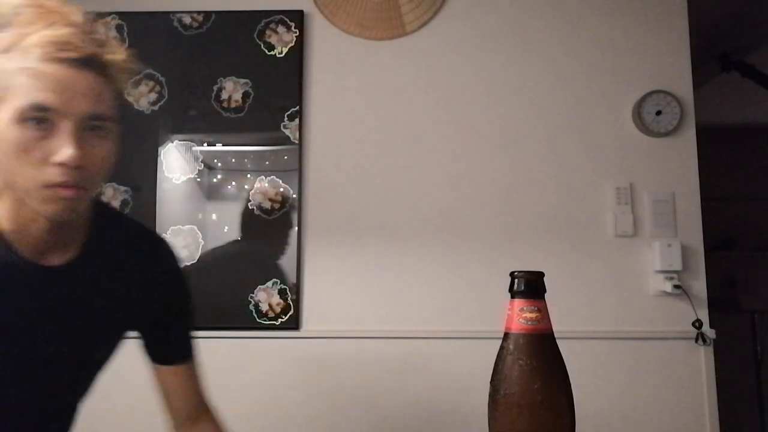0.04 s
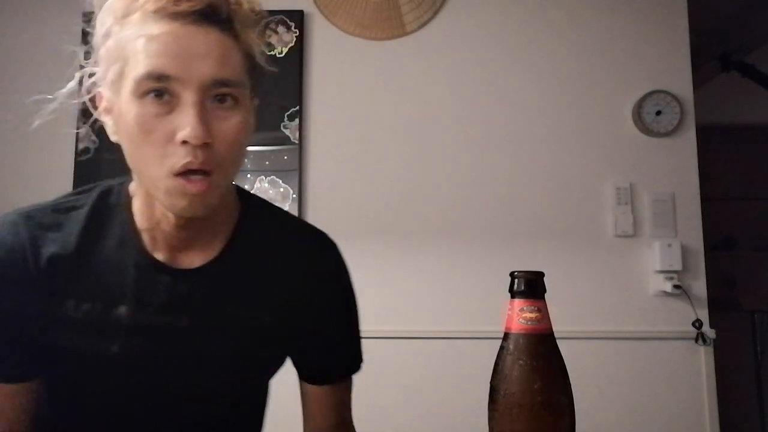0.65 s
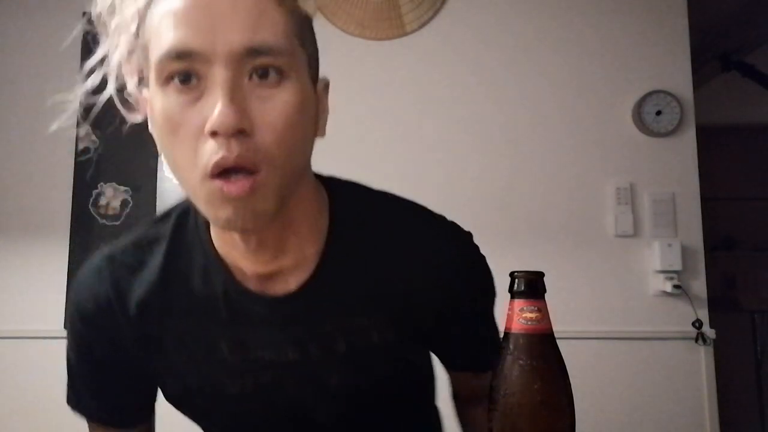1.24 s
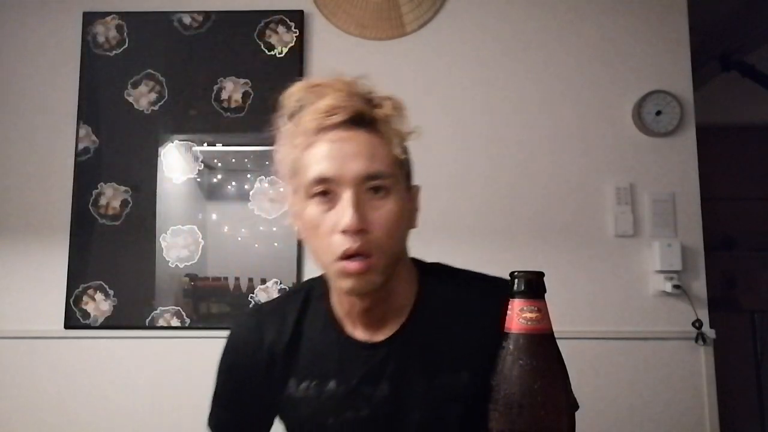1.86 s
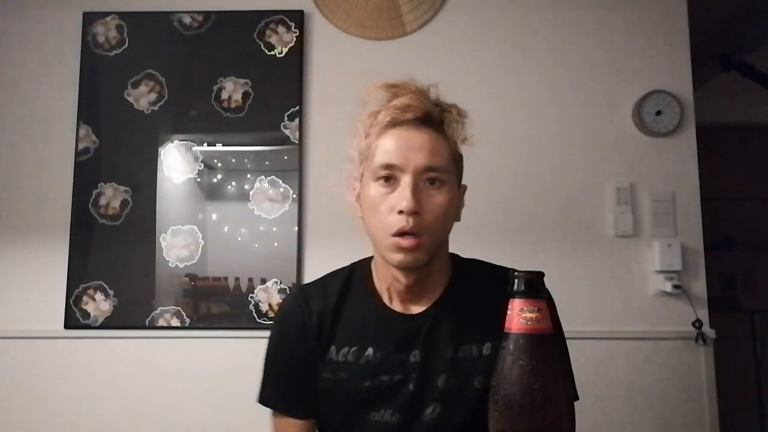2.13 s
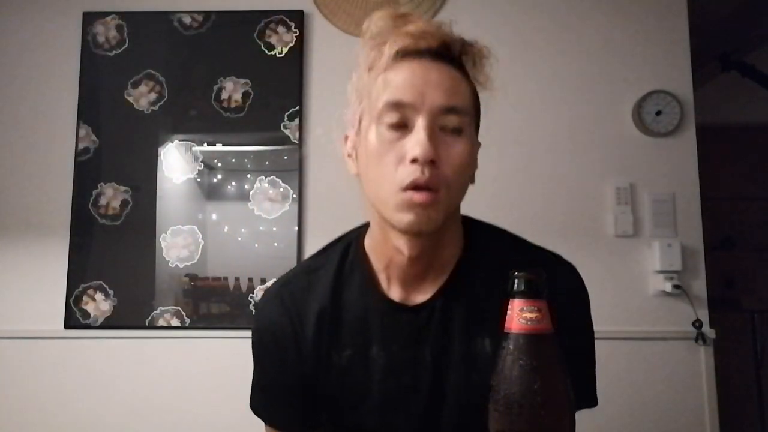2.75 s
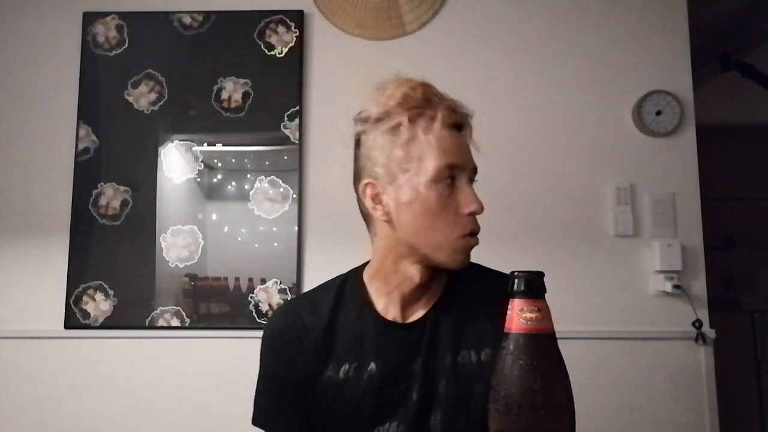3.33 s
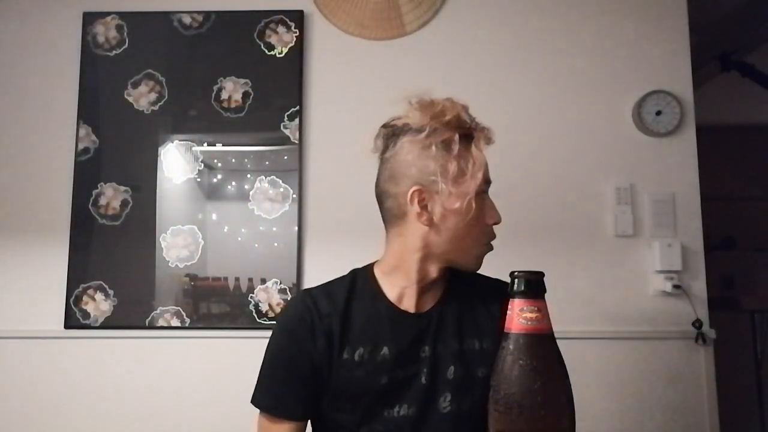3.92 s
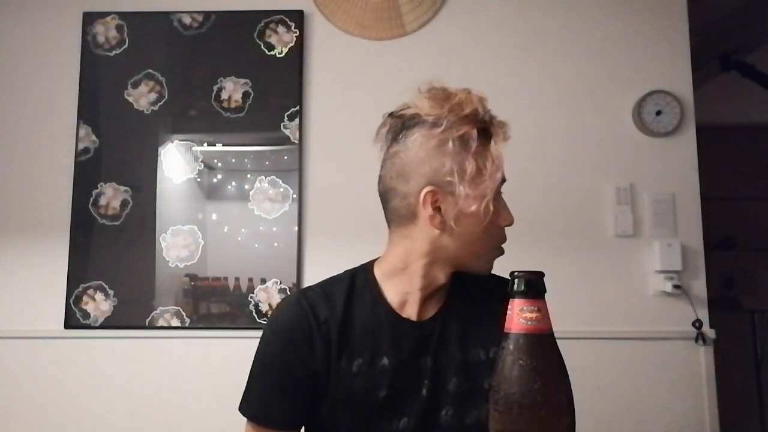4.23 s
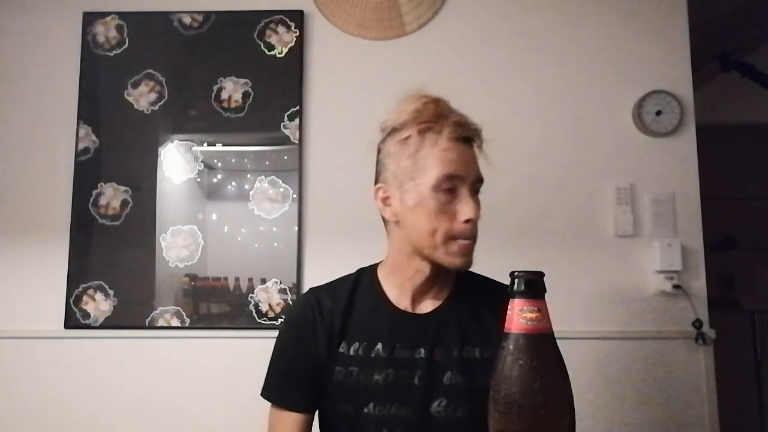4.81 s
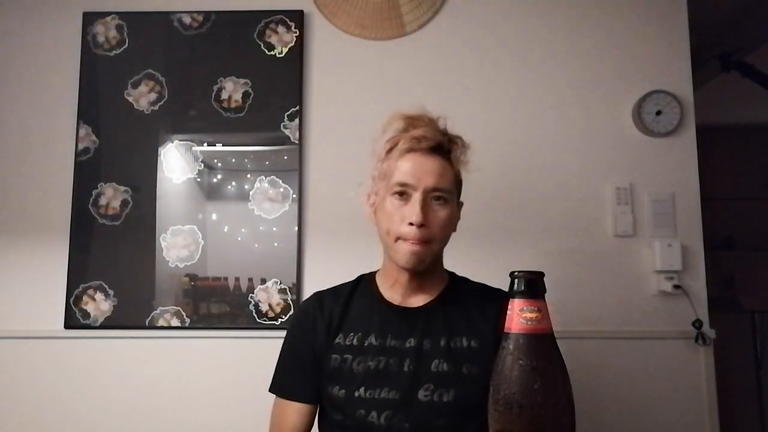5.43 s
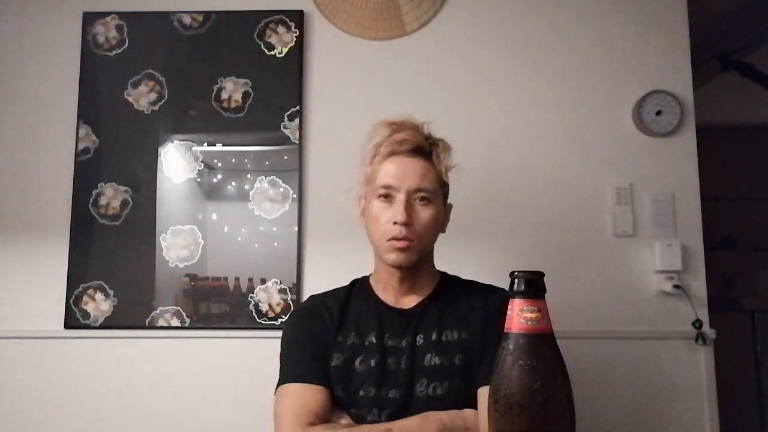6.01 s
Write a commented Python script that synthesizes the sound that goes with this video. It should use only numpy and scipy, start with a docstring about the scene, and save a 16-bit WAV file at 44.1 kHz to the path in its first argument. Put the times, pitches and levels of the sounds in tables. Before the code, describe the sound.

Two heavy thumps shake a table, then a wooden chair knocks and scrapes as someone sits down, clothes rustling, in a small room.

```python
"""Clothes rustle and a wooden chair knocks lightly over a faint low hum in a small, bare room.
Someone leans heavily on a table: two thumps shake it and set off low tones of the table and the room.
They sit down and shift the chair, with dull padded knocks, sharp wooden clacks and short scrapes.
Small things clink now and then, and every blow trails off in the room's short echo."""
import sys
import numpy as np
from scipy import signal
from scipy.fft import rfft, irfft, next_fast_len
from scipy.io import wavfile
from scipy.ndimage import map_coordinates

SR = 44100
rng = np.random.default_rng(int(sys.argv[2]) if len(sys.argv) > 2 else 0)


def waveform_to_disk(signal):
    """Save audio, clipped to [-1, 1], as 16-bit WAV at the path in sys.argv[1]."""
    frames = np.transpose(np.atleast_2d(signal))
    scaled = np.clip(frames, -1, 1) * 32767
    samples = np.round(scaled).astype(np.int16)
    wavfile.write(sys.argv[1], SR, samples)


N = 267687
T = np.arange(SR) / SR  # time since a blow [s]


def amp(db):
    """Turn decibels into a gain to multiply by."""
    return 10 ** (np.asarray(db) / 20)


def unit(x):
    """Scale a sound to an average (rms) level of 1."""
    return x / np.sqrt(np.mean(x ** 2) + 1e-20)


def unit_blow(x):
    """Scale a blow to the energy of a twentieth of a second at level 1."""
    return x / np.sqrt(np.sum(x ** 2) * 20 / SR + 1e-20)


def along(points, hz):
    """Read between (frequency [Hz], value) points, with octaves evenly spaced."""
    freqs, values = np.transpose(points)
    return np.interp(np.log(hz + 1), np.log(freqs), values)


def wobble(rate):
    """A smooth curve through `rate` random values a second."""
    values = rng.standard_normal(int(N * rate / SR) + 4)
    return map_coordinates(values, [np.arange(N) * rate / SR])


def colour(x, gain):
    """Turn each frequency of a sound up or down by gain(hz)."""
    size = 2 * next_fast_len(len(x) // 2 + SR // 10)
    gains = np.maximum(gain(np.fft.rfftfreq(size, 1 / SR)), 1e-6)
    cepstrum = irfft(np.log(gains))
    # fold the filter so that it rings only after a sound, never before
    cepstrum[1:size // 2] *= 2
    cepstrum[size // 2 + 1:] = 0
    return irfft(rfft(x, size) * np.exp(rfft(cepstrum)))[:len(x)]


def rush(spectrum):
    """Steady noise at level 1 with the given balance of low and high."""
    return unit(colour(rng.standard_normal(N), lambda hz: amp(along(spectrum, hz))))


def fade(t, t60):
    """A gain that falls 60 dB in t60 seconds, the fade time."""
    return np.exp(-np.log(1000) * np.maximum(t, 0) / t60)


def gesture(start, length, attack, t60):
    """A gain that swells from `start`, holds until `length` has passed and dies away."""
    t = np.arange(N) / SR - start
    return np.clip(t / attack, 0, 1) * fade(t - length, t60)


def resonance(hz, centre_hz, q):
    """A gain that peaks at 1 on one pitch; a higher q makes it narrower."""
    return hz / np.hypot(hz, q * (hz ** 2 - centre_hz ** 2) / centre_hz)


def soft(hz, cut_hz, leak_db):
    """A padded contact passes little above its cut-off, apart from a faint slap."""
    return 1 / np.hypot(1, (hz / cut_hz) ** 4) + amp(leak_db) / np.hypot(1, (hz / 2800) ** 4)


def add(track, start, sound):
    """Mix a sound into the track at `start` seconds."""
    part = track[round(start * SR):][:len(sound)]
    part += sound[:len(part)]


def impact(contact, t60, grain_db):
    """A chattering contact and its echoes: they build while it lasts, then die away."""
    # how long the room holds each frequency: (frequency [Hz], fade time [times t60])
    room = [(50, 1.7), (200, 1.3), (500, 0.68), (1000, 1.1), (2500, 1.1), (7000, 1.08)]
    hz, t, bands = signal.stft(rng.standard_normal(SR), SR, nperseg=256)
    fading = fade(t - contact, t60 * along(room, hz)[:, None])
    echoes = signal.istft(bands * fading, SR)[1][:SR]
    build = np.minimum(T / max(contact, 1e-4), 1) ** 0.3
    chatter = np.clip(wobble(450)[:SR], -2, 2) * fade(T - contact, 0.16)
    return echoes * build * amp(grain_db * chatter)


def ringing(tones, build):
    """Tones set off by a blow swell and fade; neighbours swing in opposite directions."""
    swell = 1 - np.exp(-T / max(build, 1e-4))
    return swell * sum((-1) ** k * amp(db + rng.normal(0, 1)) * fade(T, t60) * np.sin(2 * np.pi * hz * T)
                       for k, (hz, t60, db) in enumerate(tones))


def room_tone():
    """Faint air noise, and a hum that gathers at the room's own low pitches."""
    # noise of the air: (frequency [Hz], relative level [dB])
    air = [(12, -49), (20, -32.5), (48, -14.5), (70, -5.5), (87, -10), (107, -16.5), (204, 3), (255, -7.5),
           (304, -6), (442, -14), (785, -21.5), (1330, -24), (2800, -62), (7060, -39), (7800, -64.5),
           (10100, -91.5), (17200, -120)]
    # the room's low resonances: (pitch [Hz], width [Hz], level [dB])
    hums = [(55.75, 2.3, -61), (117.8, 13, -68.5), (205.1, 26, -64.5)]
    hum = np.zeros(N)
    for pitch, width, db in hums:
        band = colour(rng.standard_normal(N), lambda hz: 1 / (1 + (2 * (hz - pitch) / width) ** 2))
        hum += amp(db) * unit(band)
    return amp(-64) * rush(air) + hum


def clothes_rustle():
    """Cloth rubs with each movement and snags at random, more strongly when the movement is brisk."""
    # step in, lean, sit, shift the chair, turn, settle: (time [s], length [s], level [dB])
    moves = [(0, 0.47, -59.5), (1.001, 0.28, -55), (1.647, 0.92, -57.5), (2.74, 0.78, -61),
             (3.62, 0.69, -64.5), (4.75, 0.22, -73)]
    # rubbing cloth: (frequency [Hz], relative level [dB])
    cloth = [(150, -18.5), (350, 3), (600, -3), (950, -5.5), (1500, -11.5), (2700, -9.5), (3200, -15.5),
             (4200, -18), (6800, -21), (8000, -35)]
    still_db, snags_per_second = -67.5, 25
    level = amp(still_db) + sum(amp(db) * gesture(start, length, attack=0.058, t60=0.68)
                                for start, length, db in moves)
    briskness = level / level.max()
    snags = (rng.random(N) < snags_per_second / SR) * rng.random(N) * briskness
    grip = 1 + 1.13 * signal.fftconvolve(snags, fade(T, 0.077))[:N]  # each snag dies away in the room
    return level * unit(rush(cloth) * grip)


def table_rumble():
    """Shifts of weight rock the table, which trembles faintly in between."""
    # shifts of weight: (time [s], level [dB])
    rocks = [(0, -49.5), (.33, -51.5), (.976, -33), (1.231, -42), (2.53, -41.5), (2.96, -54.5), (3.21, -51)]
    # the shaking table: (frequency [Hz], relative level [dB])
    rumble = [(15, -3.5), (27, -3.5), (45, -11.5), (80, -9.5), (113, -3.5), (150, -25), (210, -11),
              (400, -48), (1000, -62.5)]
    tremble_db = -68.5
    rocking = sum(amp(db) * gesture(start, length=0.014, attack=0.014, t60=0.75) for start, db in rocks)
    return (amp(tremble_db) + rocking) * rush(rumble)


def crack(bite_hz, treble_db, edge_hz, contact, t60):
    """Struck wood gives a burst of noise, boosted at bite_hz and cut off above edge_hz."""
    # struck wood: (frequency [Hz], relative level [dB])
    wood = [(40, -23.5), (200, -2.5), (400, -0.5), (700, 0.5), (950, 3.5), (1350, -3.5), (1650, -3),
            (2100, -1.5), (2750, -1.5), (3100, -11), (3800, -8), (4500, -12), (6800, -10.5), (8000, -24.5)]

    def shape(hz):
        treble_share = along([(2400, 0.13), (4200, 0.63)], hz)
        body = amp(along(wood, hz) + treble_db * treble_share)
        bite = 1 + amp(0.5) * resonance(hz, bite_hz, q=6.1)
        return body * bite / np.hypot(1, (hz / edge_hz) ** 10)

    return unit_blow(colour(impact(contact, t60, grain_db=1), shape))


def chair_clacks():
    """Wood meets a hard surface: the harder the blow, the more the chair's frame rings with it."""
    # clacks and short scrapes:
    # (time [s], level [dB], bite [Hz], treble setting [dB], treble edge [Hz], contact time [s])
    clacks = [(0.106, -62, 2460, 17, 8000, 0.016), (0.201, -44.5, 2370, 16, 4400, 0.024),
              (0.396, -51.5, 2200, 2, 7960, .008), (1.822, -33, 1490, -4.5, 8000, 0.045),
              (2.001, -45, 2720, -1, 7800, 0.0026), (2.144, -40, 1300, -11, 7000, 0.065),
              (2.331, -33, 2620, .5, 8000, 0.0092), (2.715, -52.5, 2700, 0, 5900, .03),
              (2.791, -38, 1300, 3, 8100, 0.049), (2.94, -48, 2270, 13, 7970, 0.0074),
              (3.068, -35.5, 1250, 6, 6240, 0.012), (3.152, -37.5, 3330, 13, 3710, 0.0029),
              (3.309, -44.5, 2280, 12, 8060, 0.014), (3.448, -35.5, 1530, -4.5, 8000, 0.0035),
              (3.806, -30, 2150, 5, 7050, 0.013), (3.884, -39.5, 2120, 1, 7160, 0.02),
              (4.134, -58, 2200, -2, 5000, 0.0022), (4.166, -39, 1390, -4.5, 5620, 0.0077),
              (4.507, -47, 2140, 8.5, 4600, 0.013), (5.64, -62, 2190, -3, 2800, .02)]
    # the frame's own tones: (pitch [Hz], fade time [s], relative level [dB])
    frame = [(1005, 0.17, 4.5), (1046, 0.42, -4.5), (917, 0.32, -7.5), (1403, 0.22, -16), (2070, 0.34, -19),
             (2350, 0.32, -14), (2480, 0.12, -14), (2704, 0.19, -9), (2730, 0.13, -9.5), (3800, 0.41, -20)]
    full_ring_db = -29  # a blow this loud rings as strongly as it cracks
    out = np.zeros(N)
    for start, db, bite_hz, treble_db, edge_hz, contact in clacks:
        ring = ringing(frame, contact)
        flutter = amp(1.4 * wobble(90)[:SR])  # crossing echoes make the ring flutter
        ring = amp(0.89 * (db - full_ring_db)) * unit_blow(ring * flutter)
        hit = crack(bite_hz, treble_db, edge_hz, contact, t60=0.39)
        add(out, start, amp(db) * unit_blow(hit + ring))
    return out


def dull_knocks():
    """Padded blows, each with a hollow pitch; louder ones take longer to fade."""
    # chair legs, feet and elbows: (time [s], level [dB], pitch [Hz], contact time [s])
    knocks = [(0.11, -52.5, 580, 0.04), (0.343, -50.5, 440, .006), (0.515, -55, 566, .002),
              (1.126, -51.5, 308, .005), (1.263, -46, 490, 0.015), (1.694, -45, 413, 0.0025),
              (1.732, -44.5, 634, .003), (1.763, -44.5, 113.3, 0.018), (1.819, -39.5, 425, 0.0092),
              (1.873, -45.5, 230, 0.029), (2.16, -30, 520, 0.014), (2.168, -33, 298, 0.007),
              (2.212, -30, 293, 0.013), (2.226, -39, 117.5, 0.013), (2.405, -40.5, 446, .008),
              (2.478, -42, 352, 0.0049), (2.534, -41, 301, 0.049), (2.788, -32.5, 920, 0.0043),
              (2.828, -41.5, 790, .005), (2.967, -37.5, 537, 0.0065), (3.079, -42, 576, 0.029),
              (3.134, -41, 375, 0.002), (3.225, -43.5, 320, 0.0028), (4.42, -53, 103, 0.017),
              (5.263, -64, 770, 0.0028), (5.425, -60.5, 406, 0.0027), (5.635, -44, 466, 0.016),
              (5.718, -51, 292, .005)]
    # a knock before the padding dulls it: (frequency [Hz], relative level [dB])
    bare_knock = [(30, -14.5), (110, -8.5), (160, -8.5), (300, 1.5), (500, 1), (700, -1), (950, 0.5),
                  (1500, -1), (2500, -5.5), (7000, 11.5)]
    firm_db, doubling_db = -34, 36.5  # a firm knock; the extra level that doubles its fade time
    out = np.zeros(N)
    for start, db, pitch_hz, contact in knocks:
        cut_hz = min(1.76 * pitch_hz, 930)  # higher knocks are brighter, up to a limit
        t60 = 0.32 * 2 ** ((db - firm_db) / doubling_db)
        blow = impact(contact, t60, grain_db=-1.5)
        body = lambda hz: amp(along(bare_knock, hz)) + amp(10.5) * resonance(hz, pitch_hz, q=9)
        knock = colour(blow, lambda hz: body(hz) * soft(hz, cut_hz, leak_db=-22.5))
        add(out, start, amp(db) * unit_blow(knock))
    return out


def table_thumps():
    """Weight lands twice on the table with a slap, at spots that bring out different tones."""
    # the two landings:
    # (time [s], thud level [dB], thud cut-off [Hz], build-up [s], slap level [dB], slap edge [Hz])
    thumps = [(.713, -21, 637, 0.02, -53.5, 4500), (.976, -29, 486, 0.018, -35.5, 7030)]
    # low tones of the table and the room, set ringing by each thump:
    # (pitch [Hz], fade time [s], first thump level [dB], second thump level [dB])
    low_tones = [(26.32, 0.99, -37.5, -17.5), (52.7, 0.71, -21, -22), (79.2, 0.36, -18, -31),
                 (99, 0.73, -28, -25), (111.3, 0.61, -59.5, -24), (125.5, 0.53, -20.5, -21.5),
                 (143, 0.76, -25.5, -40), (185.4, 0.72, -29, -39), (208, 0.54, -33.5, -27),
                 (225.3, 0.5, -14.5, -36), (273, 0.38, -29, -46.5), (312, 0.3, -14, -31),
                 (349, 0.3, -27, -24), (385.4, 0.62, -31, -40.5), (446, 0.22, -11, -32),
                 (510, 0.35, -32, -35), (583, 0.58, -35.5, -53), (920, 0.29, -29.5, -64)]
    # a thud before the soft contact dulls it: (frequency [Hz], relative level [dB])
    bare_thud = [(25, -1), (60, 9), (170, -4.5), (280, 6.5), (450, 5.5), (800, -3), (1500, 6.5), (2500, 15),
                 (7000, -8.5)]
    out = np.zeros(N)
    for k, (start, thud_db, cut_hz, build, slap_db, edge_hz) in enumerate(thumps):
        blow = impact(build, t60=0.4, grain_db=1)
        thud = colour(blow, lambda hz: amp(along(bare_thud, hz)) * soft(hz, cut_hz, leak_db=-46))
        slap = crack(bite_hz=2200, treble_db=-5.5, edge_hz=edge_hz, contact=0.0068, t60=0.38)
        ring = ringing([(hz, t60, levels[k]) for hz, t60, *levels in low_tones], build)
        add(out, start, amp(thud_db) * unit_blow(thud) + ring + amp(slap_db) * slap)
    return out


def small_clinks():
    """Light contacts give a bright tick and two close tones that waver against each other."""
    # clinks: (time [s], level [dB], pitch [Hz], contact time [s], fade time [s], tones over tick [dB])
    clinks = [(.745, -55.5, 4440, 0.051, 0.53, -9.5), (0.944, -59.5, 2750, .004, .24, 6),
              (4.366, -57.5, 2804, .004, 0.36, -6), (4.366, -59, 3770, .004, 0.41, 2),
              (4.368, -60, 5460, .004, 0.63, -7), (5.423, -64, 2240, .002, 0.19, -11),
              (5.947, -59, 5450, 0.011, 0.27, -24)]
    out = np.zeros(N)
    for start, db, pitch_hz, contact, t60, tone_db in clinks:
        blow = impact(contact, t60, grain_db=-3)
        tick = unit_blow(colour(blow, lambda hz: resonance(hz, pitch_hz, q=4.3)))
        tones = unit_blow(ringing([(pitch_hz, t60, 0), (pitch_hz * 1.017, t60, -3)], contact))
        add(out, start, amp(db) * unit_blow(tick + amp(tone_db) * tones))
    return out


def scene():
    """All the sounds reach one microphone on the table."""
    blows = table_thumps() + dull_knocks() + chair_clacks() + small_clinks()
    return (blows + clothes_rustle() + table_rumble() + room_tone())[None]


def record(dry):
    """Cut away the highest treble."""
    top_hz = 7600
    low_pass = signal.firwin(221, top_hz, window=('kaiser', 7), fs=SR)
    return signal.fftconvolve(dry, low_pass[None], mode='same', axes=1)


dry = scene()
out = record(dry)
waveform_to_disk(out)
```